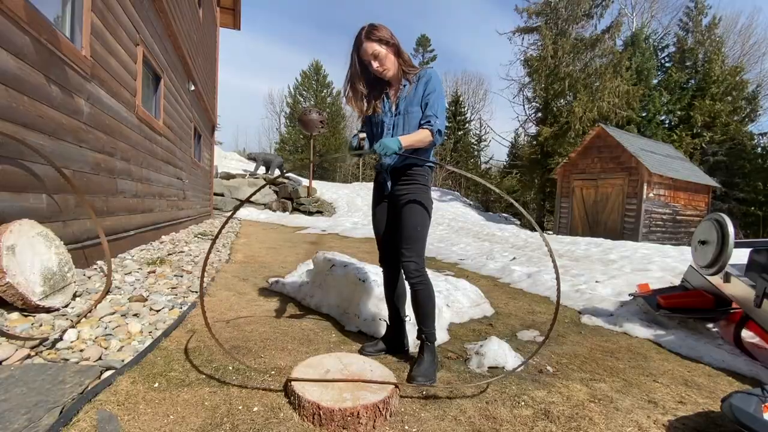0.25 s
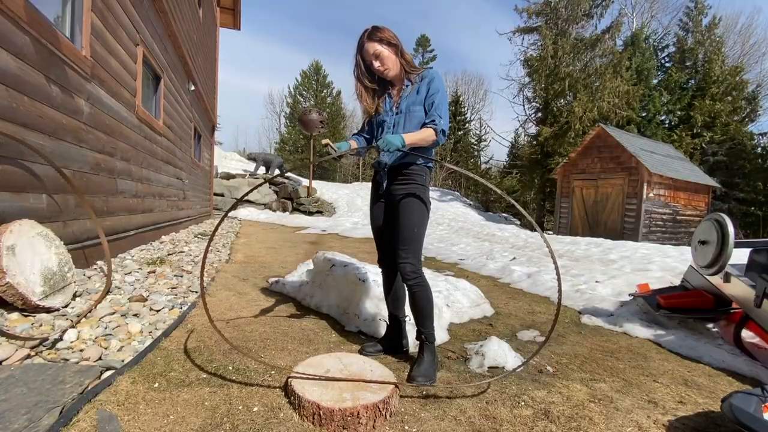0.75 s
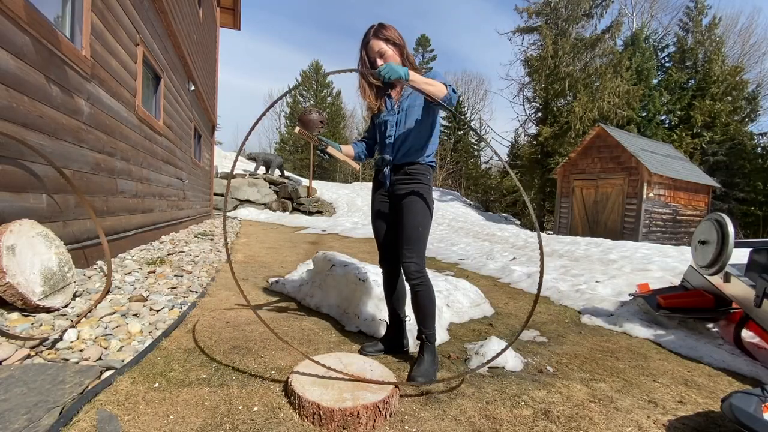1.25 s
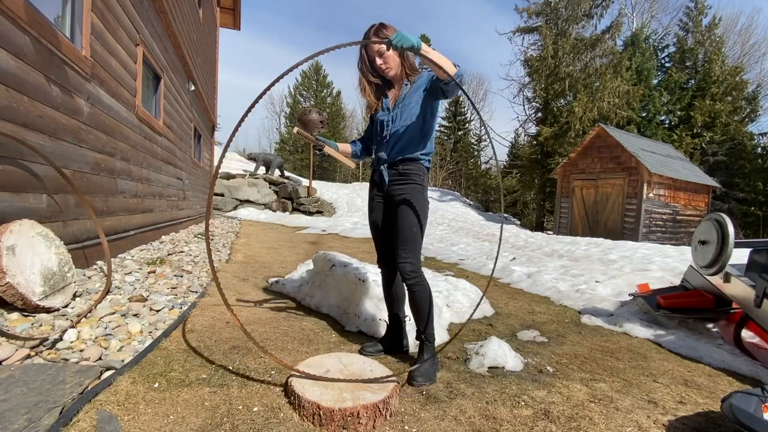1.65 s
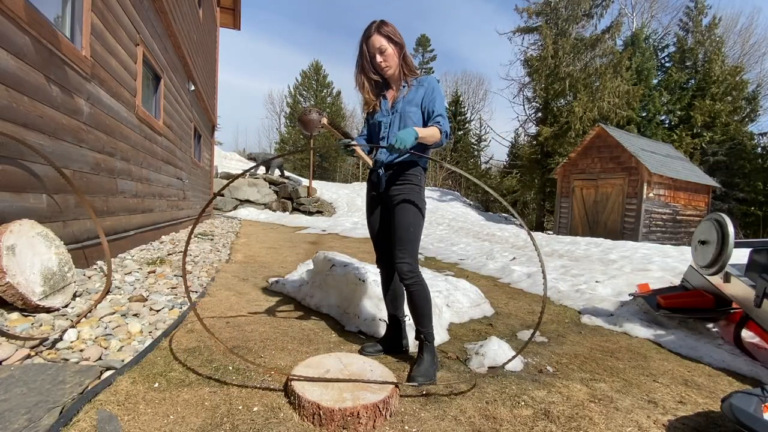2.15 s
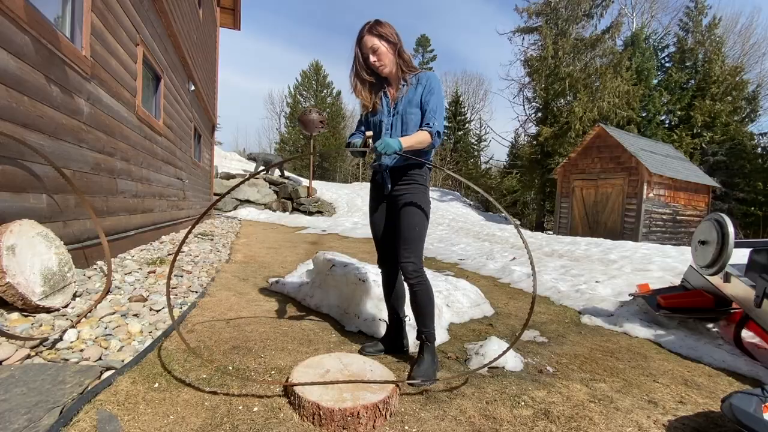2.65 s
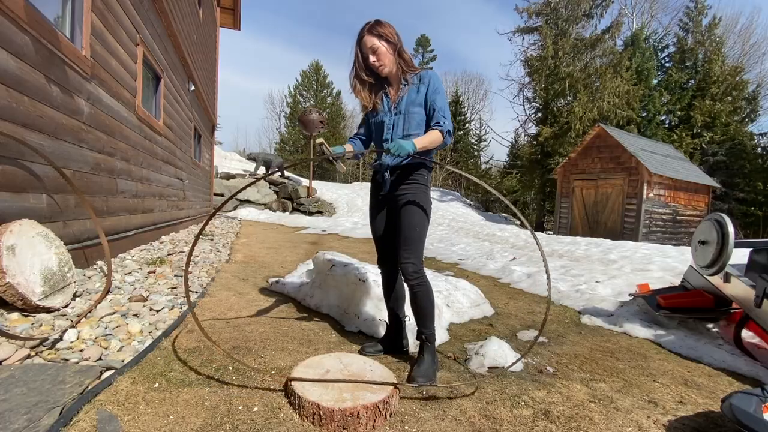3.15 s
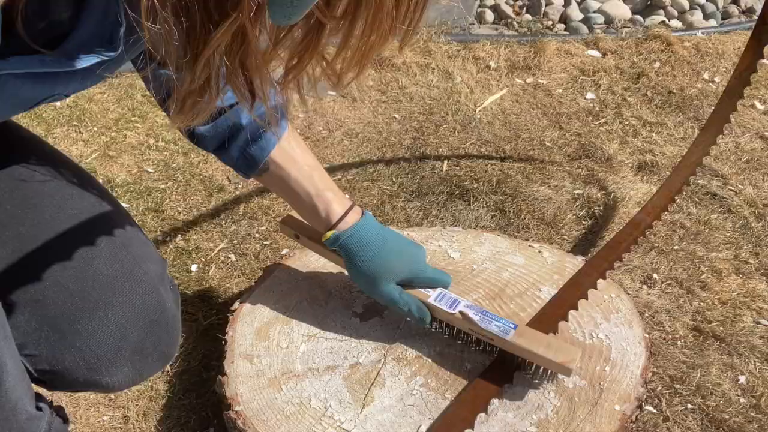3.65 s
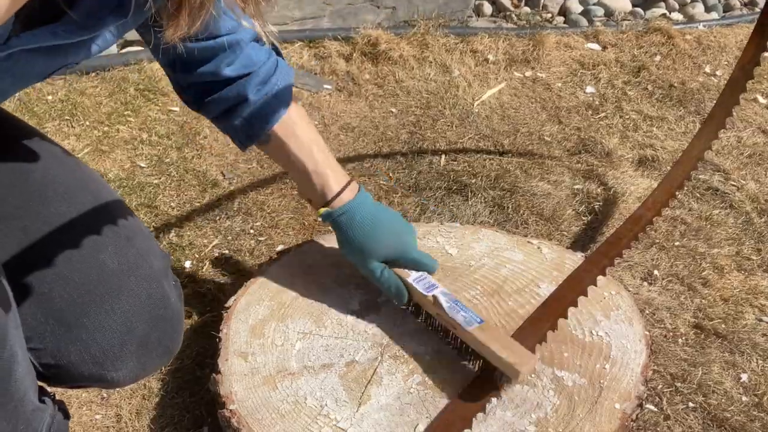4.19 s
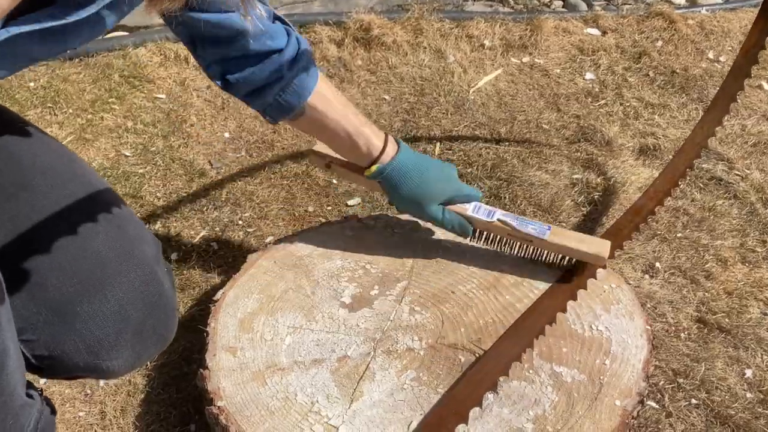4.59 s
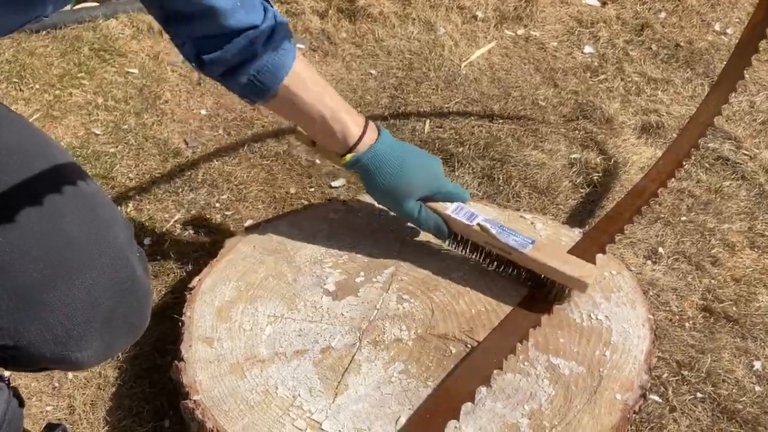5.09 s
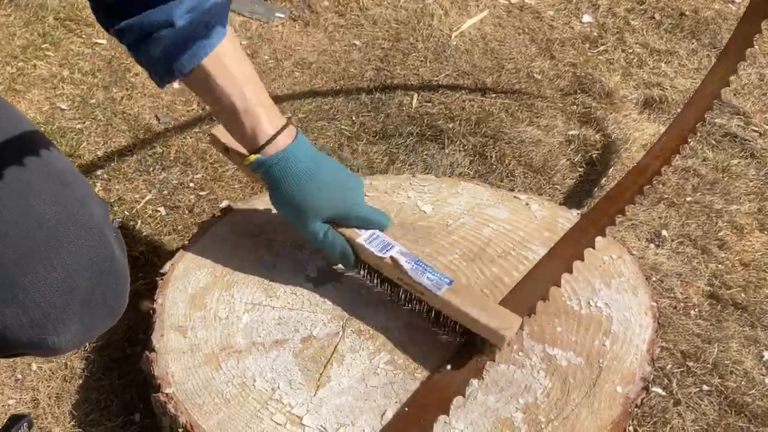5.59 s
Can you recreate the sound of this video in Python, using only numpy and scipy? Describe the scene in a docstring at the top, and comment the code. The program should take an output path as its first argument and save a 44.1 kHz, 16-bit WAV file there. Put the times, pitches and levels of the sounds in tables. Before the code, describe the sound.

Two long shimmering metallic scrapes of a wire brush along a springy saw blade outdoors, then fast close scratchy scrubbing with thumps on a stump.

```python
"""In a yard outdoors, a long band-saw blade is worked with a wire brush. First, a few metres away, it is drawn
twice through the brush: shimmering noise swells as teeth catch in bursts, and rings the modes of the free steel.
Then, close up, the brush scrubs it to and fro on a stump: noise strokes with thumps through damped modes.
Shaped noise makes the small ticks, the faint yard hiss, the light wind on the microphone pair and the deep sways
of close handling; gliding sines make two faint squeaks."""
import sys
import numpy as np
from scipy import signal
from scipy.fft import rfft, irfft
from scipy.io import wavfile
from scipy.ndimage import uniform_filter1d

SR = 44100
rng = np.random.default_rng(int(sys.argv[2]) if len(sys.argv) > 2 else 0)


def generate_wav(signal):
    """Clip the signal to [-1, 1] and save it as 16-bit WAV at the path in sys.argv[1]."""
    frames = np.transpose(np.atleast_2d(signal))
    scaled = np.clip(frames, -1, 1) * 32767
    pcm = np.round(scaled).astype(np.int16)
    wavfile.write(sys.argv[1], SR, pcm)


N = 257103
HZ = np.fft.rfftfreq(N, 1 / SR)
T = np.arange(N) / SR


def gain_of(db):
    """Decibels to gain."""
    return 10 ** (np.asarray(db) / 20)


def evened(x):
    """Scales to rms 1."""
    return x / np.sqrt(np.mean(abs(x) ** 2) + 1e-20)


def colour(points):
    """Gain at every frequency, drawn through (Hz, dB) points on a log frequency axis."""
    f, db = np.transpose(points)
    return gain_of(np.interp(np.log(HZ + 1), np.log(f + 1), db))


def level(tables, column=1):
    """Gain curve from tables of dB rows, silent outside them."""
    out = np.zeros(N)
    for rows in tables:
        rows = np.array(rows)
        inside = (T >= rows[0, 0]) & (T < rows[-1, 0])
        out[inside] = gain_of(np.interp(T[inside], rows[:, 0], rows[:, column]))
    return uniform_filter1d(out, size=90)  # about 2 ms, against clicks


def flutter(hz, db):
    """Random gain of rms 1 that wavers mostly slower than hz times a second."""
    slow = irfft(rfft(rng.standard_normal(N)) / (1 + (HZ / hz) ** 2), N)
    return evened(gain_of(db * evened(slow)))


def bristles(spread_db):
    """Two dense streams of wire slips, most small, a few large."""
    size = gain_of(spread_db * np.minimum(rng.exponential(1, N), 5))  # a slip reaches both microphones
    return evened(size * rng.standard_normal((2, N)))


def shimmer(x, narrow_db, broad_db):
    """Thin brief tones and wide patches of colour, as when a contact point travels over wires and modes."""
    hz, _, z = signal.stft(x, SR, nperseg=1024, noverlap=768)
    thin, wide = rng.standard_normal((2,) + z.shape[1:])
    thin = uniform_filter1d(thin, size=9, axis=1)
    thin = evened(uniform_filter1d(thin, size=2, axis=0))
    wide = uniform_filter1d(wide, size=4, axis=1)
    wide = evened(uniform_filter1d(wide, size=30, axis=0))
    depth = (hz / (hz + 900))[:, None]  # the bass stays more even
    z = z * gain_of(depth * (narrow_db * thin + broad_db * wide))
    return evened(signal.istft(z, nperseg=1024, noverlap=768)[1][:, :N])


def bursts(rows, rise_ms, lead_ms, bass_haste):
    """Envelopes of treble, middle and bass for events that rise fast and die away."""
    power, t = np.zeros((3, N + SR)), np.arange(SR // 2) / SR * 1000
    haste = np.array([[1], [1], [bass_haste]])
    for s, db, middle_db, dying_ms, bass_db in rows:
        shape = (1 - np.exp(-(t / rise_ms) ** 2)) * np.exp(-t / dying_ms * haste)
        peaks = gain_of(db + np.array([[0], [middle_db], [bass_db]]))
        at = round((s - lead_ms / 1000) * SR)
        power[:, at:at + len(t)] += (peaks * shape) ** 2
    return np.sqrt(power[:, :N])


def radiate(slips, drive, splits_hz, modes, ring_db, mid, side, side_db, link, turn):
    """Slips drive broad hiss plus ringing modes; the microphone difference is partly tied to the sum."""
    under_top, under_low = (1 / (1 + (HZ / hz) ** 6) for hz in splits_hz)
    shares = 1 - under_top, under_top - under_low, under_low
    a, b = sum(share * rfft(slips * part) for share, part in zip(shares, drive))
    rings = 0
    for hz, width, db in modes:
        skirt = np.sqrt(2 * hz * HZ / (hz ** 2 + HZ ** 2)) ** 8  # keeps each mode near its pitch
        rings = rings + gain_of(db + ring_db) * skirt / (1 + 2j * (HZ - hz) / width)
    tied = link * np.exp(1j * turn) * a + np.sqrt(1 - link ** 2) * b  # turn: phase in radians
    scale = 1 / np.sqrt(np.mean(abs(mid + rings) ** 2))
    m = irfft(a * (mid + rings) * scale, N)
    s = irfft(tied * (side + rings) * scale, N) * gain_of(side_db)
    return np.array([m + s, m - s])


def pulls():
    """Two pulls through the brush: rubbing and catches hiss through the free blade, knocks mostly ring it."""
    slips = shimmer(bristles(spread_db=2.5), narrow_db=3.0, broad_db=1.5)
    sound = rfft(brushed_blade(slips)) + rfft(knocks(slips[::-1]))
    notch = 1 - 0.79 * np.exp(-((HZ - 12300) / 330) ** 2)  # one narrow band of the treble stays weak
    return gain_of(-3.5) * irfft(sound * notch, N)


# Teeth catching in the wires. Each row: moment in seconds, drive in dB before the blade's response,
# weight of the middle in dB, weight of the bass in dB.
CATCHES = [(0.087, -37, -17, -22), (0.106, -37.5, -21, -26), (0.13, -40, -9, -14), (0.168, -34, -3, -11),
           (0.191, -36, -5, -3), (0.225, -36.5, -13, -5), (0.244, -40, -11, -18), (0.278, -38, 6, -14),
           (0.3, -36, -1, -14), (0.33, -36, -3, -19), (0.382, -38.5, 6, -17), (0.411, -37.5, -1, -14),
           (0.459, -38, 1, -16), (0.494, -36.5, 6.5, -0.5), (0.514, -39, 7, -13), (0.546, -36, 8.5, -13),
           (0.566, -40, -2, -22), (0.602, -30.5, 5, -1), (0.63, -37, 8, -4), (0.654, -33, 5, 1),
           (0.713, -41.5, 11, 9.5), (0.739, -36, 5, 1), (0.772, -30, -6, -2), (0.792, -39, 1, -8),
           (0.827, -39, 12, 8), (0.88, -32.5, 4.5, -2.5), (0.911, -38.5, 6, 3), (0.949, -36.5, -1, 1),
           (0.968, -38, -4, 4), (1.011, -32.5, 2.5, -6), (2.336, -33, -6, -6), (2.36, -37, -8, -4),
           (2.392, -32.5, -7, -2), (2.42, -40, -8, -4), (2.449, -42, -1, 5), (2.474, -36, 2, 1.5),
           (2.506, -36, 5, 6.5), (2.523, -39.5, 6, 8), (2.586, -38, 2, -9), (2.617, -33.5, -3, -2),
           (2.667, -31, 3.5, -0.5), (2.691, -37, 4, 1), (2.717, -32, -5, -9), (2.776, -36, 7, 5.5),
           (2.801, -41, 8, 7), (2.838, -43, 6, -7), (2.889, -35.5, 8.5, 1), (2.943, -32, 1, 0),
           (3, -30, 6, 0), (3.079, -41, 2, 0), (3.109, -30.5, 2.5, -0.5), (3.132, -38.5, 4, 5.5),
           (3.171, -38, -19, -3)]
CATCH_DYING_MS = 13.2


def brushed_blade(slips):
    """Steady rubbing and bursts of catching teeth add in power and drive the blade."""
    rubbing = rubbing_level() * flutter(hz=60.3, db=1.0) * gain_of([[0], [-4], [-5]])
    rows = [(s, db, middle, CATCH_DYING_MS, bass) for s, db, middle, bass in CATCHES]
    catches = bursts(rows, rise_ms=7.2, lead_ms=5.6, bass_haste=0.83)
    drive = np.hypot(rubbing, catches)
    return free_blade(slips, drive, ring_db=6.2, side_db=0.27, link=0.32, turn=0.94)


# The blade drawn through the brush. Each row: start in seconds, stop in seconds,
# rubbing drive at the start in dB, at the stop in dB, before the blade's response.
PULLS = [(0.079, 1.002, -50, -46), (2.325, 3.15, -47.5, -45.5)]
GRIP_S, LET_GO_DB_PER_S = 0.0097, -215  # the rubbing sets in at once and trails off after the stop


def rubbing_level():
    """Each pull grips, drifts from its first level to its last, and trails off."""
    curves = []
    for start, stop, first_db, last_db in PULLS:
        gone = (stop + .25, last_db + .25 * LET_GO_DB_PER_S)
        curves.append([(start, first_db - 8), (start + GRIP_S, first_db), (stop, last_db), gone])
    return level(curves)


# Knocks on the blade. Each row: moment in seconds, drive in dB before the blade's response,
# weight of the middle in dB, dying time of treble and middle in ms, weight of the bass in dB.
KNOCKS = [(1.115, -58, 13, 22, 8), (1.6775, -50.5, 6.5, 42, 20), (1.8023, -67, 8, 19, 15),
          (2.2816, -64.5, 11.5, 31, 8), (2.3274, -30, 3, 16, 5)]


def knocks(slips):
    """Light knocks: short bursts drive the blade with its ringing turned up."""
    drive = bursts(KNOCKS, rise_ms=.7, lead_ms=.3, bass_haste=1.9)
    struck = free_blade(slips, drive, ring_db=12.0, side_db=-0.54, link=0.83, turn=1.5)
    blunt = 1 / (1 + (HZ / 9500) ** 4) / (1 + (750 / (HZ + 1)) ** 4)  # duller, without deep bass
    return irfft(rfft(struck) * blunt, N)


# Pitches of the free blade's modes, in Hz.
BLADE_HZ = (505, 953, 1110, 2455, 2900, 3880, 4635, 6270, 6530, 8865, 9700, 10700, 11495, 14180, 15120,
             15240, 15420, 15700)
# The same modes. Each row: width in Hz, strength in dB before the ringing is set.
BLADE = [(40, -19.5), (39.6, -2), (60, -13), (34.6, -11), (83, -4), (60, -7), (110, -4), (30, -11),
         (70.6, -0.5), (59, 2.5), (40, -9), (40, -35), (35.2, 7), (90, -13), (70, 2), (60, 1), (70, -3),
         (60.4, -17)]
# Colour of the hiss in the sum of the two microphones. Each row: frequency in Hz, relative density in dB.
PULL_SUM = [(180, -46), (300, -30), (502, 3), (735, -9), (942, 2.5), (1430, -16), (2860, -0.5),
            (3270, -2.5), (6450, -1), (7250, -3.5), (9140, 3.5), (10800, -3.5), (11500, -18), (12100, 1.5),
            (15800, -2)]
# Colour of the hiss in their difference. Each row: frequency in Hz, relative density in dB.
PULL_DIFFERENCE = [(180, -46), (300, -21), (825, -11), (942, -5), (1360, -10), (3920, -7.5), (4550, 2.5),
                   (5560, -22.5), (6450, 7.5), (7130, -5), (11700, -0.5), (12300, -22), (15800, 12)]


def free_blade(slips, drive, ring_db, side_db, link, turn):
    """The free steel answers with hiss and with ringing modes."""
    modes = [(hz, *row) for hz, row in zip(BLADE_HZ, BLADE)]
    mid, side = colour(PULL_SUM), colour(PULL_DIFFERENCE)
    return radiate(slips, drive, (3400, 1500), modes, ring_db, mid, side, side_db, link, turn)


# The brush bumping the blade against the stump. Each row: moment in seconds,
# drive of the middle in dB, drive of the bass in dB, before the response of blade and stump.
THUMPS = [(3.785, -60, -48), (3.87, -44, -46), (3.96, -54, -47), (4.03, -45, -42), (4.105, -42, -38),
          (4.222, -44.5, -47), (4.35, -44, -40), (4.503, -39, -36), (4.624, -49, -45), (4.71, -44, -43),
          (4.765, -47, -46), (4.915, -35, -41), (4.945, -41, -42), (4.975, -54, -45), (5.075, -46.5, -45),
          (5.195, -41, -44), (5.25, -43, -38), (5.275, -45, -39), (5.35, -44, -48), (5.468, -49, -47),
          (5.52, -47.5, -40), (5.605, -45, -45), (5.664, -37, -40)]
# Pitches of the modes of the blade lying on the stump, in Hz.
STUMP_HZ = (250, 472, 2760, 3210, 3733, 4710, 5875, 7175, 7524, 7620, 7932, 8330, 8550, 11480, 11945, 12635)
# The same modes. Each row: width in Hz, strength in dB before the ringing is set.
STUMP = [(49.4, 4), (40, 3.5), (70, -0.5), (69.5, -16), (25.3, 3.5), (40.2, 3), (30, 1), (30, -43),
         (20, -59), (20, -25), (50, -23), (20, -18), (20, -32), (40, -34), (25, -24), (30, -18)]
# Colour of the hiss in the sum of the two microphones. Each row: frequency in Hz,
# relative density in dB before the top is cut.
SCRUB_SUM = [(88, -51), (150, -14), (251, -1), (334, -5.5), (471, 1), (729, -7), (1500, -2.5), (1960, -7.5),
             (2720, -6), (2930, -6), (6160, -6), (8360, 2.5), (10300, -4.5), (12700, 0.5), (14200, -4.5)]
# Colour of the hiss in their difference. Each row: frequency in Hz, relative density in dB.
SCRUB_DIFFERENCE = [(88, -65), (150, -33), (333, -15), (464, 2), (1070, -9), (1710, 2), (2170, -0.5),
                    (4630, 1.5), (5850, 0), (7250, -27), (9340, -27), (12500, 13), (15800, 12.5)]
LANDING_DB, LANDING_S = 8.5, 0.023  # the middle is fuller while the wires first land


def scrub():
    """Each stroke hisses through the damped blade; bumps against the stump thump in middle and bass."""
    rows, starts = stroke_levels(), np.array(STROKES)[:, 0]
    since = T - starts[np.maximum(np.searchsorted(starts, T) - 1, 0)]
    landing = gain_of(LANDING_DB * np.exp(-abs(since) / LANDING_S))
    thumps = [(s, 0, middle, 22.0, bass) for s, middle, bass in THUMPS]  # dying over 22 ms
    _, middle_bumps, bass_bumps = bursts(thumps, rise_ms=6.4, lead_ms=8.3, bass_haste=0.92)
    whole = level(rows) * flutter(hz=70, db=0.27)
    middle = whole * level(rows, column=2) * landing * gain_of(9)
    middle = np.hypot(middle, middle_bumps) * flutter(hz=35, db=2.2)
    bass = np.hypot(whole * level(rows, column=3) * gain_of(11.5), bass_bumps)
    slips = shimmer(bristles(spread_db=2.0), narrow_db=4.0, broad_db=1.52)
    modes = [(hz, *row) for hz, row in zip(STUMP_HZ, STUMP)]
    top_cut = 1 / (1 + (HZ / 14300) ** 120)  # the sum of the two microphones has no hiss above about 14.3 kHz
    mid, side = colour(SCRUB_SUM) * top_cut, colour(SCRUB_DIFFERENCE)
    sound = radiate(slips, (whole, middle, bass), (3300, 800), modes, -5.5, mid, side, -8.5, 0.89, 1.32)
    return gain_of(0.5) * sound * (T > STROKES[0][0])  # silent before the first stroke


# Scrubbing strokes. Each row: start in seconds, rise in ms, first bite in dB, crest in seconds, crest in dB,
# stop in seconds, level at the turn in dB, weight of the middle in dB, weight of the bass in dB.
# All levels and weights are drive, before the response of blade and stump.
STROKES = [(3.679, 10, -44, 3.74, -44, 3.818, -54, -26, -26),
           (3.857, 18, -42, 3.87, -36, 4.0, -53, -22.5, -25),
           (4.018, 14, -42, 4.08, -40, 4.17, -50.5, -15, -19.5),
           (4.175, 20, -45, 4.265, -37, 4.33, -51, -26, -32),
           (4.343, 16, -44, 4.411, -40.5, 4.48, -49.5, -17, -21),
           (4.495, 14, -43.5, 4.58, -41, 4.605, -50, -19.5, -29),
           (4.615, 20, -46, 4.705, -39.5, 4.75, -52, -16, -17.5),
           (4.757, 10, -42, 4.77, -42, 4.872, -55, -17.5, -21.5),
           (4.894, 10, -38, 4.9, -35, 5.037, -50, -15, -21),
           (5.02, 8, -44, 5.14, -41, 5.158, -51, -18, -23.5),
           (5.18, 15, -41, 5.207, -38, 5.326, -52.5, -11.5, -16.5),
           (5.342, 14, -44, 5.41, -40, 5.505, -53.5, -16, -23),
           (5.512, 18, -46, 5.59, -42.5, 5.652, -51, -16, -20.5),
           (5.658, 6, -42, 5.72, -43, 5.77, -49, -16.5, -25),
           (5.79, 16, -47, 5.8, -42, 5.95, -50, -22.5, -21)]
TURN_THINS_DB = -4.5  # bass at both turns, middle at the closing one
SAG_DB_PER_S, LIFT_S = -60, 0.035  # sag after the crest, fall into the turn
CREEP_DB = 2.5  # the wires creep louder while the brush rests at the turn


def stroke_levels():
    """Rows of bristle level, middle and bass weight: bite, crest, sag, then the fall into the turn."""
    rows, before_db, thin = [], -62, TURN_THINS_DB
    for row, following in zip(STROKES, list(STROKES[1:]) + [[np.inf]]):
        start, rise_ms, bite_db, crest, crest_db, stop, turn_db, middle_db, bass_db = row
        bite, stop = start + rise_ms / 1000, min(stop, following[0])
        lift = max(stop - LIFT_S, bite)
        crest = np.clip(crest, bite, lift)
        sagged_db = crest_db + SAG_DB_PER_S * (lift - crest)
        rows += [(start, before_db, middle_db, bass_db + thin),
                 (bite, bite_db, middle_db, bass_db),
                 (crest, crest_db, middle_db, bass_db),
                 (lift, sagged_db, middle_db, bass_db),
                 (stop, turn_db, middle_db + thin, bass_db + thin)]
        before_db = turn_db + CREEP_DB * min((following[0] - stop) / .02, 1)
    return [rows]


# Faint squeaks of the flexing blade. Each row: start in seconds, length in seconds,
# level in dB before flutter and panning, first pitch in Hz, last pitch in Hz.
SQUEAKS = [(1.705, 0.055, -66, 3980, 3800), (1.715, 0.065, -74, 6250, 6150)]


def squeaks():
    """Thin tones that slide down a little, slightly rough."""
    out = np.zeros(N)
    for s, length, db, first_hz, last_hz in SQUEAKS:
        u = np.clip((T - s) / length, 0, 1)
        turns = np.cumsum(first_hz + (last_hz - first_hz) * u) / SR
        swell = np.sin(np.pi * u ** .6)
        out += gain_of(db) * swell * np.sin(2 * np.pi * turns)
    return out * flutter(hz=80, db=2.5) * gain_of([[1.5], [-1.5]])


# Dry ticks of grit and gloves. Each row: start in seconds, relative level in dB,
# centre in Hz, time to fall by 60 dB in seconds.
TICKS = [(1.2553, -43.5, 10400, 0.077), (1.4344, -56, 3940, 0.098), (1.512, -53, 3110, 0.079),
         (1.5524, -53, 13400, 0.079), (1.7594, -71, 3710, 0.11), (2.0283, -54, 4430, 0.13),
         (2.0694, -66, 4260, 0.11), (2.1056, -50, 9800, 0.069), (3.365, -51, 10300, 0.087),
         (3.4257, -48.5, 3500, 0.099), (3.6494, -55, 8850, 0.11)]


def ticks():
    """Short puffs of noise around a broad centre."""
    out, t = np.zeros((2, N)), np.arange(8192) / SR
    around = np.fft.rfftfreq(len(t), 1 / SR) + 1
    for s, db, hz, t60 in TICKS:
        envelope = np.minimum(t / 0.0041, 1) * gain_of(db - 12.0 - 60 * t / t60)
        puff = rng.standard_normal((2, len(t))) * envelope
        at = round(s * SR)
        out[:, at:at + len(t)] += irfft(rfft(puff) * np.exp(-(np.log(around / hz) / 0.86) ** 2))
    return out


# Colour of the yard hiss. Each row: frequency in Hz, relative density in dB.
YARD = [(88, -21), (150, -1.5), (221, -2.5), (285, -8), (801, -12), (1360, -8.5), (1680, -8), (3200, -24),
        (7530, -34), (9900, -34), (12300, -36.5), (13500, -37), (15800, -30.5)]
# Its course. Each row: time in seconds, level in dB before the trim, weight of the bass in dB.
YARD_DB = [(0.0, -67.5, 5), (0.2, -71.5, 1), (0.57, -70.5, -3.5), (0.8, -64.5, -0.5), (1.33, -71, 3.5),
           (1.79, -65.5, 3), (2.05, -70, 3), (2.95, -65, 3.5), (3.44, -70.5, 5), (3.68, -70, -0.5),
           (5.83, -71.5, 0)]


def yard():
    """A distant, smooth and wide hiss, more central in the bass."""
    bass = 1 / (1 + (HZ / 550) ** 4)
    noise = rfft(shimmer(rng.standard_normal((2, N)), narrow_db=2.5, broad_db=3.0)) * colour(YARD)
    low, high = irfft(noise * bass, N), irfft(noise * (1 - bass), N)
    low = low * level([YARD_DB], column=2) * np.array([[1], [.45]])
    mid, side = (high + low) / high.std()
    return gain_of(-2.5) * level([YARD_DB]) * np.array([1.14 * (mid + side), mid - side])


# Colour of the low rumble. Each row: frequency in Hz, density in dB before the deep end is cut.
RUMBLE = [(12, -69), (20, -32), (43, -30.5), (78, -6.5), (108, -4.5), (187, -15), (220, -17.5), (414, -35),
          (500, -40), (650, -60), (1100, -120)]


def wind_and_handling():
    """Lumpy low rumble, partly opposite in the two microphones, over a deeper sway."""
    lumps = rng.standard_normal((3, N)) * flutter(hz=12, db=1.8)
    mid, side = irfft(rfft(lumps[:2]) * colour(RUMBLE) * np.exp(-(55 / (HZ + 1)) ** 2), N)
    deep = irfft(rfft(lumps[2]) * np.exp(-(np.log((HZ + 1) / 44) / .42) ** 2), N)
    rumble, sway, opposite = swell_levels()
    mid = rumble * evened(mid) + sway * evened(deep)
    side = opposite * evened(side) + 0.094 * mid
    return np.array([mid + side, mid - side])


# Low swells: puffs of wind, and from about 4 s deep sways from handling close up. Each row: middle in seconds,
# half length in seconds, peak in dB, weight of the deepest part in dB,
# weight of the part opposite in the two microphones in dB.
SWELLS = [(0.053, 0.045, -63, -12, -4), (0.925, 0.062, -54.5, -30, -1), (1.572, 0.047, -62.5, -27, 3),
          (1.684, 0.034, -57, -28, 5), (1.97, 0.06, -67.5, -20, 1), (2.28, 0.04, -60, -25, 8.5),
          (2.38, 0.03, -57, -34, -3), (2.595, 0.086, -64.5, -33, 5), (2.762, 0.068, -70, -24, 4),
          (2.98, 0.04, -69, -28, -9), (3.151, 0.033, -47.5, -33, 13), (3.23, 0.022, -47, -37, 5),
          (3.3, 0.02, -62, -25, 6), (3.395, 0.022, -53, -39, 0), (3.666, 0.04, -64.5, -10, -1),
          (4.05, 0.07, -79, 13, 2), (4.123, 0.05, -72, 2, -5), (4.33, 0.047, -72, 8, -9),
          (4.66, 0.04, -74, 2, -8), (4.72, 0.04, -69, -20, -10), (4.802, 0.035, -73, 4, -6),
          (4.942, 0.037, -60, -30, -21), (5.07, 0.06, -78, 7, -10), (5.243, 0.036, -66, -23, -16),
          (5.404, 0.059, -71, -10, -11), (5.796, 0.094, -71, -1, -10)]
# Breeze between the swells. Each row: time in seconds, level in dB,
# weight of the part opposite in the two microphones in dB.
BREEZE = [(0.0, -88, 2), (0.35, -90, 2), (0.6, -79, -3), (1.3, -77.5, -4), (1.85, -75, 4), (2.15, -76, -6),
          (2.5, -70.5, 6), (3.0, -72, 4), (3.45, -70, 9), (3.7, -76, 4), (3.8, -80, -4), (4.5, -77.5, -10),
          (5.83, -78.5, -9)]
BREEZE_DEEP_DB = -20


def swell_levels():
    """Level of the rumble, of its deepest part and of its opposite part: bell-shaped swells over a breeze."""
    weights = np.array([np.ones(N), gain_of(BREEZE_DEEP_DB) * np.ones(N), level([BREEZE], column=2)])
    power = (level([BREEZE]) * weights) ** 2
    for s, half, db, deep_db, opposite_db in SWELLS:
        bell = np.exp(-((T - s) / half) ** 2)
        power = power + (gain_of([[db], [db + deep_db], [db + opposite_db]]) * bell) ** 2
    return np.sqrt(power)


def scene():
    """All sources."""
    return pulls() + scrub() + squeaks() + ticks() + yard() + wind_and_handling()


EDGE_HZ = 15780


def record(dry):
    """The band limit: a steep low-pass closes the treble at EDGE_HZ."""
    lowpass = signal.firwin(801, EDGE_HZ, window=("kaiser", 9), fs=SR)
    return signal.oaconvolve(dry, lowpass[None], "same")


dry = scene()
out = record(dry)
generate_wav(out)
```